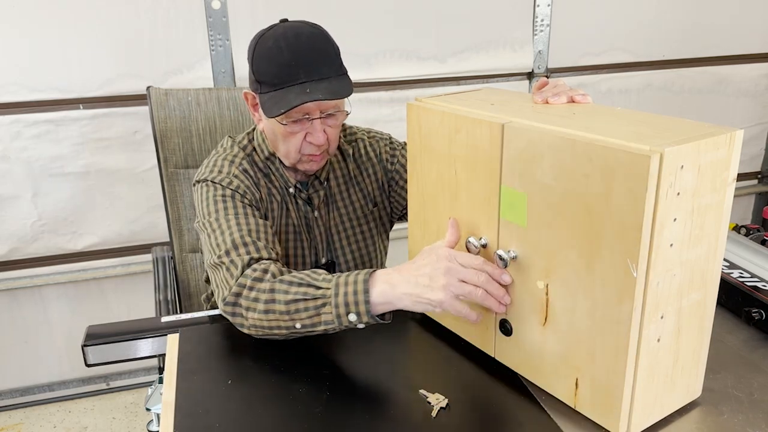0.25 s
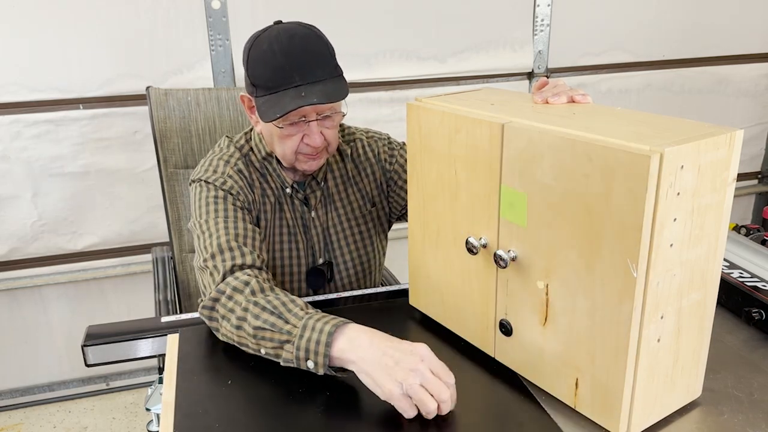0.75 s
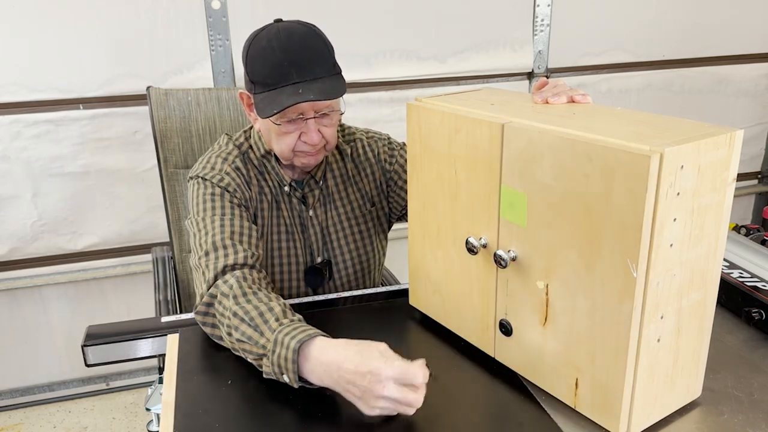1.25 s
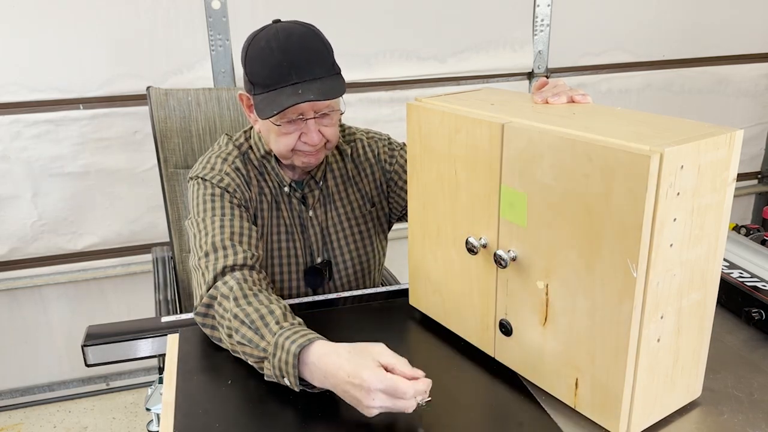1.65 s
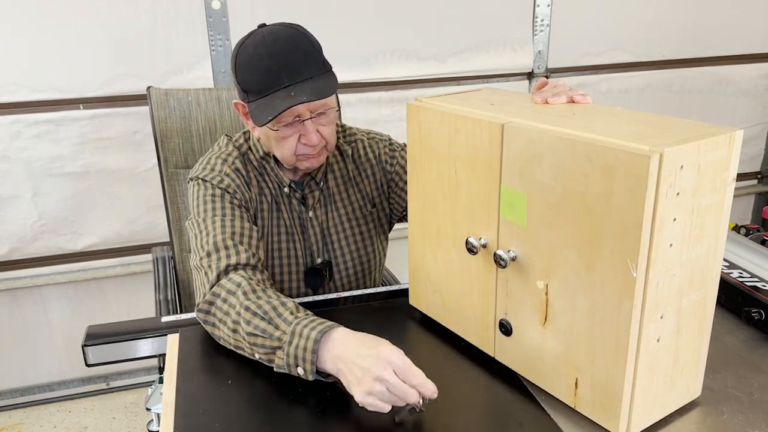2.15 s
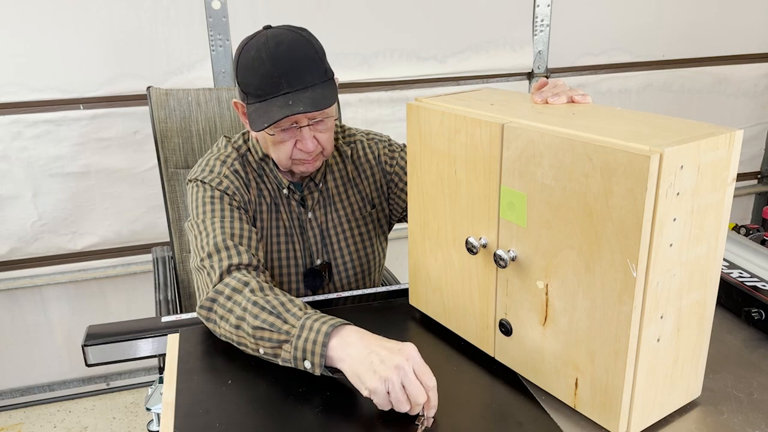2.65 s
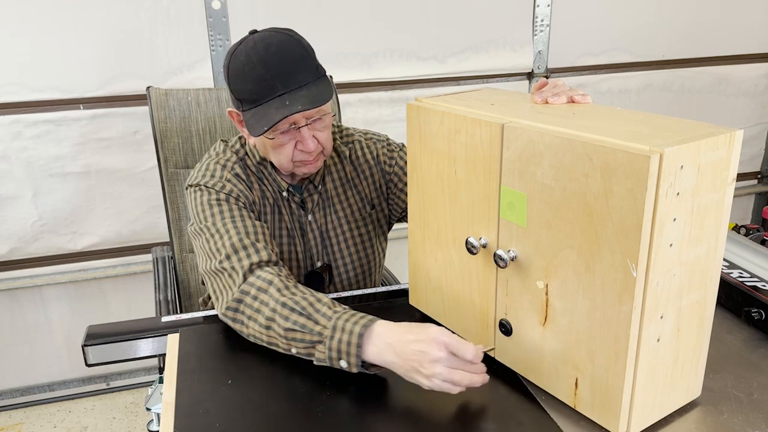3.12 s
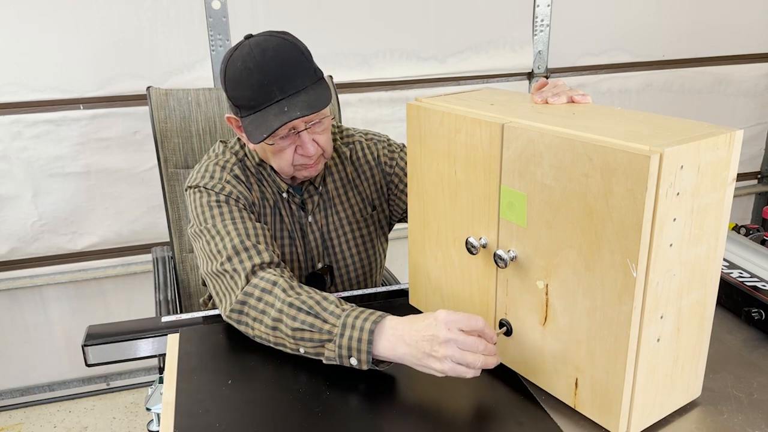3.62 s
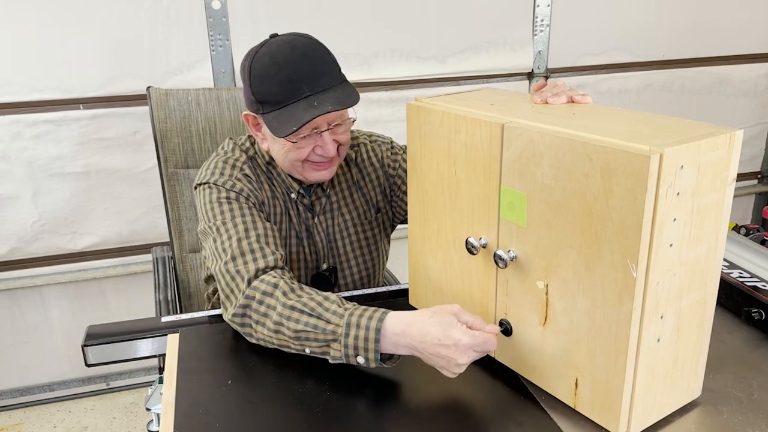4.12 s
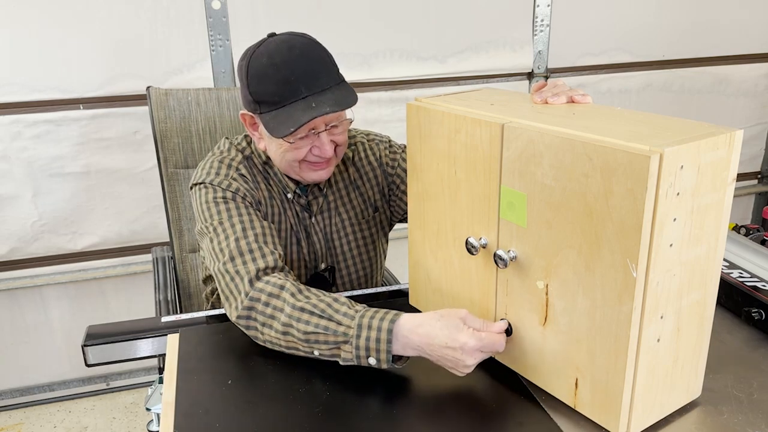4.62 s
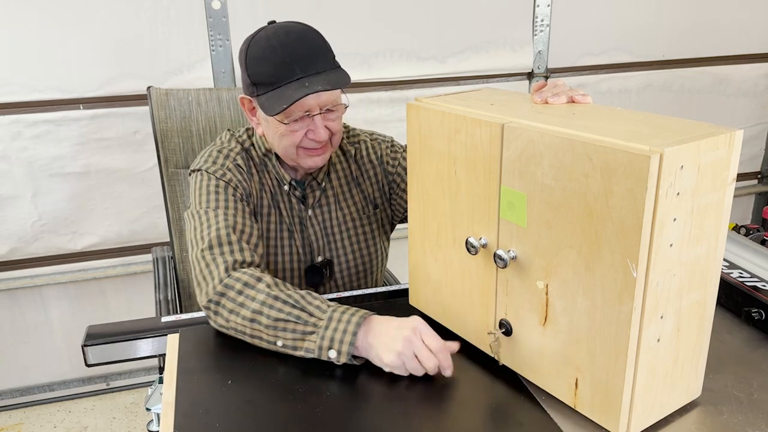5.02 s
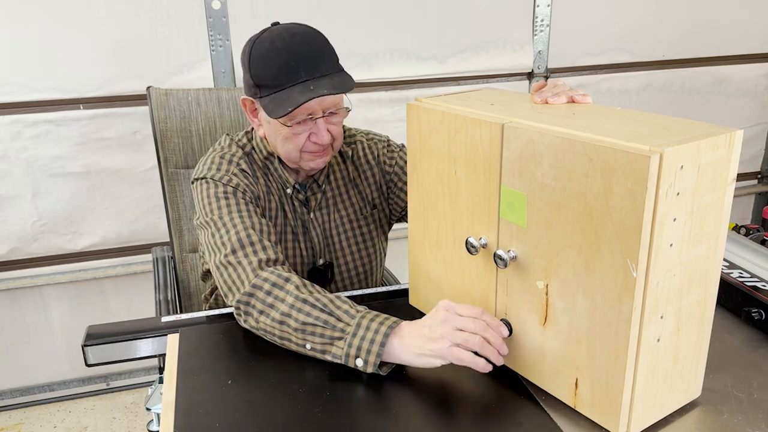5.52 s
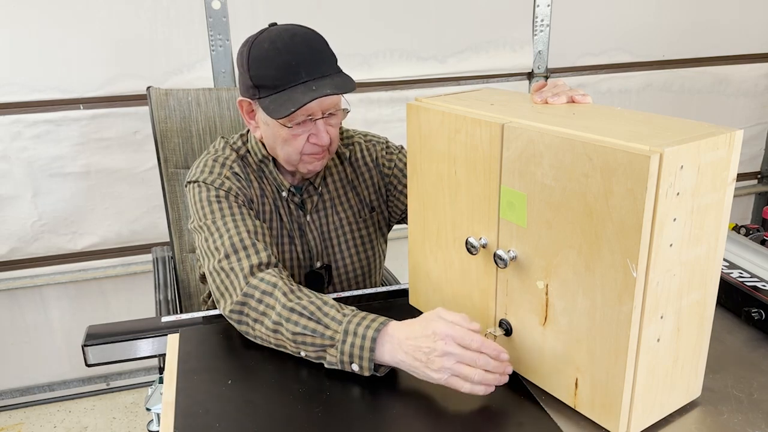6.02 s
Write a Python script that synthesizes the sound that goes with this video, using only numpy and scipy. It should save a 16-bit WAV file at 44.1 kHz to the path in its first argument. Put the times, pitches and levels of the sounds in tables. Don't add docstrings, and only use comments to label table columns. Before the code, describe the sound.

A plywood cabinet door slams shut at once, distorting slightly. Fingers scrape a small key off a table top; it clinks, drops with sharp clacks and is dragged up again. It then ticks into a cam lock, with woody knocks through the door, and a firm clack follows as the locked door is tugged. Faint sleeve rustle and hand shuffling run beneath. Close microphone in a quiet garage with short reverberation.

```python
import sys
import numpy as np
from scipy import signal
from scipy.fft import rfft, irfft, next_fast_len
from scipy.io import wavfile
from scipy.ndimage import uniform_filter1d

SR = 44100
rng = np.random.default_rng(int(sys.argv[2]) if len(sys.argv) > 2 else 0)


def voltage_ratio(decibels):
    exponent = np.asarray(decibels, float) / 20
    return 10 ** exponent


def file_out(sig):
    cols = np.atleast_2d(sig).T
    lim = np.clip(cols, -1, 1)
    pcm = np.round(lim * 32767).astype(np.int16)
    wavfile.write(sys.argv[1], SR, pcm)


N = 276507

# (time [s], peak [dB], thud [dB], bright [dB], contact [ms])
SLAM_HITS = [
    (0, 4.5, 4, 7, 3.5),
    (.01, -1.5, 6, -2, 3.3),
    (.027, -5, 11.5, 9, 4.6),
    (.036, -11, 12, -8, 2.2),
    (.046, -14, 12, -11, 6.1),
    (.065, -23, 10, 0, 12),
    (.17, -55.5, 27.5, -16, 5.8),
    (.214, -51, -2, -8, 1.4),
    (.35, -49.5, 12, -7.5, 3.8),
]
# (frequency [Hz], width [Hz], level [dB])
CARCASS_MODES = [(190, 25, -12), (248, 28, -1), (297, 18, 2), (396.4, 52, -3.5), (544.4, 40, -4),
                 (593, 65, 2), (872, 140, 2.5), (1080, 290, 7.5), (1460, 250, 7.5), (1821, 220, 3.5),
                 (2440, 820, 6.5), (3080, 600, 9.5), (4740, 880, 2.5), (6800, 2200, -4)]
# (frequency [Hz], level [dB per Hz])
AIR_COLOUR = [(12, -13.5), (20, -20), (55, 2), (808, -11), (904, -11), (1270, -18), (3880, -17),
              (6080, -13.5), (7190, -20), (8500, -19), (16200, -32.5)]
# (frequency [Hz], decay by 60 dB [s])
GARAGE_DECAY = [(100, 0.4), (400, 0.2), (2000, 0.2), (6000, 0.15), (14000, 0.069)]
# (hands [dB], sleeve [dB])
AT_REST = (-67.5, -71)
# (start [s], hold [s], level [dB], fade by 20 dB [s])
SLEEVE_MOVES = [(.1, 0.049, -51, 0.1), (.4, 0.038, -53.5, 0.46), (1.05, 0.1, -53.5, 0.34),
                (2.39, 0.023, -44.5, -0.09), (2.93, 0.27, -51, 0.11), (2.75, 0.7, -61, -0.1),
                (4.16, 0.075, -55, 0.1), (4.52, 0.017, -51.5, 0.43), (4.8, .05, -51, .5),
                (4.92, 0.13, -46.5, 0.14), (5.33, 0.048, -48, 0.27), (5.5, 0.16, -53.5, -0.06),
                (5.84, 0.37, -61, 0.3)]
# (frequency [Hz], level [dB per Hz])
CLOTH_COLOUR = [(410, -38), (700, -3), (852, -7), (1260, -12), (1380, -12.5), (3030, -10.5), (4210, -10.5),
                (6920, -12.5), (14000, -25), (16000, -31)]
# (start [s], hold [s], level [dB], fade by 20 dB [s])
HAND_MOVES = [
    (.27, 0.024, -51, 1),
    (.79, 0.019, -35.5, 0.1544),
    (1.05, 0.42, -59.5, -1.5),
    (2.37, 0.31, -44, 0.17),
    (3.8, 0.98, -54.5, 1.5),
    (4.87, 0.0092, -44, .5),
    (5.53, 0.034, -50.5, -0.5),
    (5.88, 0.39, -56.5, -0.3),
]
# (frequency [Hz], level [dB per Hz])
SHUFFLE_COLOUR = [(35, -41.5), (60, -20.5), (155, -9.5), (363, -4.5), (593, -12.5), (665, -14),
                  (759, -16.5), (3000, -26), (3900, -57), (6600, -120)]
# (time [s], peak [dB], thud [dB], bright [dB])
PICK_UP_HITS = [(0.604, -42, 13.5, 0.5), (0.662, -49, 24, -18), (0.733, -23.5, -22, 1.5),
                (0.745, -23, -7, -7), (0.762, -13.5, -12, -1), (0.78, -23, -19, -16), (0.803, -27, -22, 2),
                (0.837, -26.5, 0, -19.5), (0.897, -33, 9, -4), (0.938, -17.5, -9.5, 4),
                (1.1288, -20.5, -12, -8), (1.289, -51.5, 29.5, -19), (1.319, -49, 10, -14.5)]
# (time [s], peak [dB], thud [dB], bright [dB])
DROP_HITS = [(1.492, -23, -6, -14.5), (1.555, -15, -21.5, -14), (1.606, -22.5, -12.5, -17),
             (2.1946, -3, -18, -3.5), (2.24, -1.5, -3.5, -10), (2.2528, 0.5, -8, -17),
             (2.2603, -1, -13, -1.5), (2.2662, -9, -6.5, -15), (2.2898, -7, -20, -10),
             (2.3703, -12.5, -33.5, -7.5), (2.391, -13.5, -38, -3.5), (2.4093, -14.5, -20, 4),
             (2.4205, -19, -2, -2), (2.432, -24, -5, -15), (2.708, -38, -13, -20), (2.7282, -29, -25, -10),
             (2.7559, -22, -7, -2), (2.801, -29, -5, -14), (2.835, -25, -21, -4), (2.85, -21.5, -20, -3)]
# (middle [s], length [s], level [dB], thud [dB], bright [dB])
TABLE_SLIDES = [(0.754, 0.05, -31, -8, 4), (0.79, 0.062, -35.5, -2.5, 0.5), (0.836, .09, -41.5, 1, -4),
                (0.905, 0.05, -51, 14.5, -1), (0.94, 0.019, -21, -28, 3.5), (0.97, .07, -45, -34, 1),
                (1.071, .05, -41, -24, 1), (1.099, .07, -45.5, -13, -11), (2.324, .12, -29.5, -7.5, -15),
                (2.43, .06, -32, -20, 1), (2.505, .14, -42, -21, -16), (2.589, .1, -30, -29, -10),
                (2.682, .15, -45, -7, -22), (2.822, .08, -40, -7, -7)]
# (time [s], peak [dB])
GRAIN_SKIPS = [(.7506, -18.5), (.7958, -28), (.8196, -25.5), (.8272, -31), (1.0573, -39), (1.0714, -31),
               (1.0838, -33), (1.0998, -33), (1.1062, -34), (1.1118, -33), (1.1137, -35), (1.1185, -28),
               (2.2787, -19), (2.3006, -20), (2.3105, -24), (2.3228, -24), (2.3453, -21), (2.3573, -25),
               (2.3621, -24), (2.4063, -22.5), (2.4261, -21.5), (2.445, -31), (2.5173, -34), (2.5318, -32),
               (2.5357, -30), (2.5632, -26), (2.5779, -20.5), (2.5942, -20.5), (2.6087, -22.5),
               (2.6234, -29), (2.6507, -36), (2.6644, -35), (2.6779, -36), (2.6901, -35), (2.7592, -27),
               (2.7615, -31), (2.7699, -34), (2.8063, -35), (2.8099, -33), (2.8136, -33), (2.8191, -34),
               (2.8232, -32.5), (2.8292, -30.5)]
# (frequency [Hz], width [Hz], level [dB])
TABLE_MODES = [(285.7, 35, 15), (547, 76, 7), (710, 51.5, 8.5), (1082, 58, 5), (1360, 135, 1.5),
               (1850, 112, 3), (2230, 370, -3), (2711, 140, 4.5), (3590, 316, 3), (4713, 260, 7.5),
               (6100, 990, -1.5), (7400, 900, -26)]
# (time [s], level [dB])
TABLE_PUSHES = [(.61, -51), (0.666, -47.5), (0.739, -42), (0.9, -48), (0.941, -50.5), (1.292, -46),
                (1.55, -61.5), (2.196, -43.5), (2.243, -39), (2.411, -48.5), (2.63, -52), (2.719, -48),
                (3.99, -57.5), (4.2, -58.5), (4.345, -44.5), (4.387, -47.5), (4.737, -48), (4.865, -49.5),
                (5.589, -58)]
# (middle [s], length [s], frequency [Hz], width [Hz], level [dB])
PRESSED_WOOD = [(.785, .06, 824, 42, -29), (.75, 0.032, 5400, 150, -39), (.734, 0.0099, 580, 270, -31.5),
                (.762, .04, 1170, 60, -30), (.795, .03, 620, 120, -28.5), (.905, .05, 700, 250, -38),
                (.955, .04, 1150, 100, -35.5), (0.99, .03, 1900, 150, -39), (2.585, .06, 2200, 140, -33),
                (2.6, .05, 3650, 190, -36.5), (2.635, 0.0248, 297, 58, -38), (2.695, .05, 2000, 250, -46),
                (2.71, 0.0251, 647, 100, -39.5), (4.39, .055, 544, 29, -23), (4.393, .06, 285, 31, -22.5),
                (4.417, .018, 420, 215, -25), (4.45, .1, 295, 21, -32), (2.258, .035, 720, 96, -20.5),
                (2.42, .06, 700, 120, -33), (5.603, 0.035, 680, 100, -23), (3.755, .03, 620, 140, -33),
                (4.41, .03, 1170, 100, -30), (4.375, 0.014, 2650, 220, -33), (5.875, 0.055, 499, 330, -44),
                (5.91, 0.0396, 335, 70, -42.5)]
# (middle [s], length [s], frequency [Hz], width [Hz], level [dB])
RUBBED_KEY = [(1.092, 0.055, 10410, 10, -55), (1.2, 0.032, 10410, 33, -66), (2.1, .02, 8300, 150, -58.5),
              (.757, .05, 6050, 250, -33.5), (.757, .045, 11100, 300, -41), (.75, .04, 10400, 230, -43),
              (.768, .03, 4200, 140, -36), (.94, .016, 6600, 500, -30), (.942, .025, 10800, 600, -38),
              (2.225, 0.097, 10410, 40, -50), (2.22, 0.068, 11160, 40, -52), (2.33, .08, 10030, 40, -59),
              (2.376, .025, 15500, 120, -59), (2.38, .03, 9000, 100, -56), (2.425, 0.054, 10450, 330, -46),
              (2.44, .1, 11200, 40, -62), (2.485, .05, 10400, 20, -66), (2.59, .05, 11050, 250, -57),
              (2.9, .07, 7100, 200, -63), (2.78, 0.058, 10410, 15, -48), (2.768, 0.027, 10950, 200, -49),
              (2.772, .04, 8650, 300, -53), (2.766, .03, 13500, 1500, -52), (2.825, .06, 10950, 120, -54),
              (2.855, 0.0603, 10410, 20, -55), (2.875, .06, 15500, 120, -59), (1.19, .09, 15510, 30, -60),
              (2.895, .04, 10450, 60, -57), (5.512, .04, 6050, 400, -50), (5.512, .02, 7800, 200, -49),
              (5.512, .035, 10750, 400, -52), (5.578, .02, 10700, 500, -50),
              (5.618, .035, 9900, 250, -42.5), (5.615, .04, 15600, 80, -60)]
# (time [s], decay by 60 dB [s], frequency [Hz], width [Hz], level [dB])
METAL_TICKS = [(.762, 0, 890, 496, -21), (.7815, 0.04, 910, 500, -21), (.897, -0.06, 455, 200, -31),
               (1.072, 0.08, 1510, 500, -38), (1.1582, .012, 11000, 3000, -38),
               (3.551, -0.03, 6500, 899, -41.5), (3.614, 0.03, 6440, 1200, -47),
               (3.726, 0, 3500, 1500, -48), (4.078, 0, 1800, 500, -47), (2.2893, -0.02, 700, 300, -17),
               (.7815, -0.03, 4800, 500, -28), (.802, .025, 4750, 150, -29.5), (.89, -0.04, 6200, 600, -44),
               (.9165, .012, 6100, 500, -43), (.9165, -0.07, 4200, 400, -40), (.928, -0.14, 4000, 400, -42),
               (2.421, -0.02, 4600, 900, -25), (2.846, 0.011, 11500, 2800, -37),
               (2.9037, .008, 12000, 2500, -46.5), (2.9137, 0.012, 11500, 2800, -33),
               (5.837, .035, 2800, 500, -33), (5.852, 0.016, 5900, 900, -37),
               (5.867, 0.03, 6500, 1800, -42), (6.108, 0, 1490, 501, -41), (6.236, -0.05, 600, 300, -44)]
# (time [s], peak [dB], upper tone [dB])
KEY_CLINKS = [
    (1.129, -57.5, -16),
    (1.9978, -62.5, -5.5),
    (2.1952, -41, 7),
    (2.2613, -46, -4),
    (2.4089, -46, -5),
    (2.7564, -52, -8),
    (2.8465, -49, 9),
    (4.3856, -52, 7),
    (4.6838, -57, 3),
    (4.7875, -57, -1),
]
# (time [s], peak [dB], upper tone [dB])
SPARE_CLINK_HITS = [
    (2.2951, -45.5, -8),
    (2.373, -51, 4),
    (2.9047, -64, 19),
]
# (time [s], peak [dB], upper tone [dB], ring time [s])
DANGLING_CLINK = [
    (1.1525, -33.5, -3, 0.06),
]
# (time [s], level [dB], ring time [s])
LOOSE_SWINGS = [
    (1.153, -43.5, 0.07),
    (2.375, -62, .015),
    (2.914, -45, 0.004),
]
# (frequency [Hz], level [dB], decay by 60 dB [s])
KEY_TONES = [(10390, -1, 0.2), (10200, -28.5, 0.2), (15510, -18, .1)]
# (frequency [Hz], level [dB], decay by 60 dB [s])
KEY_UPPER = [(11160, 0, .2)]
# (frequency [Hz], level [dB], decay by 60 dB [s])
KEY_BENDING = [(3833, -1, .22), (8231, 0, .6)]
# (frequency [Hz], level [dB], decay by 60 dB [s])
SPARE_TONES = [(10030, 0, .2)]
# (frequency [Hz], level [dB], decay by 60 dB [s])
SPARE_UPPER = [(10860, 0, .2)]
# (time [s], peak [dB], thud [dB], bright [dB])
DOOR_HITS = [(3.551, -24, -15, -14), (3.603, -32.5, -17, -20), (3.614, -33, -0.5, -16),
             (3.743, -19.5, -26.5, -22), (3.754, -33.5, 9, -32), (3.94, -42, 6.5, -16.5),
             (3.97, -27.5, -25, -14), (4.009, -21.5, -12, -30), (4.2035, -20, -4.5, -18),
             (4.218, -16.5, -8.5, -35), (4.338, -19.5, -1.5, -31), (4.368, -20.5, 4, -18),
             (4.382, -16, 1, -4.5), (4.394, -19, 0, -9), (4.407, -12, -3, -2), (4.524, -30, -16, -11.5),
             (4.686, -25, -2, -23), (4.692, -32, -21, -5), (4.722, -38, 3.5, -8), (4.743, -37.5, 7.5, -7),
             (4.843, -44, 12, -18.5), (4.866, -29.5, 7, -5), (4.903, -37, 1, -18), (5.247, -38, -29, -18)]
# (middle [s], length [s], level [dB], thud [dB], bright [dB])
BARREL_TURNS = [
    (3.999, 0.18, -48.5, 8, -32),
    (4.213, 0.075, -45.5, 9.5, -13),
    (4.394, 0.081, -31, 4.5, -8),
    (4.547, .1, -47.5, 5, -13),
    (4.906, .14, -49.5, -7, -17),
    (5.515, 0.045, -39.5, 0.5, -14),
    (5.895, 0.091, -59.5, 0, -0.5),
]
# (time [s], peak [dB])
SLOT_PROBES = [
    (4.6655, -41),
    (4.6833, -38),
    (4.7105, -39),
    (4.8763, -39),
    (5.5821, -37),
]
# (frequency [Hz], width [Hz], level [dB])
DOOR_MODES = [(240.8, 10.4, 5.5), (297, 26.5, 8), (353.3, 21, 10.5), (542, 53, 11), (597.5, 32, 12),
              (712, 47, 6), (973, 69, 1.5), (1334, 132, 5), (1950, 270, -8.5), (2260, 340, -0.5),
              (2687, 173, -0.5), (3320, 270, 0.5), (4480, 630, -9), (6440, 580, 0.5)]
# (time [s], peak [dB], thud [dB], bright [dB])
LOCKED_HITS = [(5.4455, -23.5, -17, -18), (5.479, -38, 11, -17), (5.502, -40, -4, -8),
               (5.517, -34, -2, -12), (5.586, -12.5, -6, 5), (5.5872, -5, 1.5, -15), (5.602, -23, 3.5, -11),
               (5.619, -38.5, -17.5, -8), (5.836, -32, -0.5, -5), (5.867, -25.5, -4, -6),
               (5.852, -41, 15, -4), (5.906, -34, -7.5, -17), (6.108, -39.5, -12, -14),
               (6.235, -46.5, 4.5, -21)]
# (frequency [Hz], width [Hz], level [dB])
LOCKED_MODES = [(354.2, 15, 4.5), (440, 53, 7), (587, 98, 7), (724, 83, 11), (1033, 114, 2),
                (1400, 180, 3.5), (1800, 48, -5), (2340, 290, 0.5), (2800, 260, -1.5), (3310, 230, 2),
                (4350, 700, 0), (6030, 3300, 2)]


def along(points, hz):
    f, v = np.transpose(points)
    return np.interp(np.log(hz + 1), np.log(f + 1), v)


def filtered(x, response):
    m = next_fast_len(N + SR // 2)
    return irfft(rfft(x, m) * response(np.fft.rfftfreq(m, 1 / SR)), m)[..., :N]


def unit(x):
    return x / np.sqrt(np.mean(x ** 2) + 1e-20)


def timed(hits, ms):
    return [(*hit, ms * voltage_ratio(0.18 * (hit[1] + 22.0))) for hit in hits]


def forces(hits, strokes, grit_db, snap):
    force = np.zeros((3, N + SR))
    t = np.arange(SR // 10) / SR
    for s, db, thud_db, bright_db, ms in hits:
        u = t * 1000 / max(ms, .2)
        burst = (u + 0.12) * np.exp(-1.5 * u) * rng.standard_normal((3, len(t)))
        burst[0] = 0.55 * burst[0] + 3 * np.exp(-t / 0.00022)
        burst[1:, 0] += [snap, snap / 3]
        burst /= np.linalg.norm(burst, axis=1, keepdims=True)
        start = round(s * SR)
        force[:, start:start + len(t)] += voltage_ratio([[db + thud_db - 12.5], [db], [db + bright_db]]) * burst
    for s, length, db, thud_db, bright_db in strokes:
        u = np.arange(SR // 4) / SR / length
        grain = voltage_ratio(grit_db * rng.standard_normal(len(u) // 40 + 1)).repeat(40)[:len(u)]
        grit = rng.standard_normal((3, len(u))) * grain
        swell = np.sin(np.pi * np.minimum(u, 1)) ** 2
        start = round((s - length / 2) * SR)
        level = voltage_ratio([[db + thud_db], [db], [db + bright_db]])
        force[:, start:start + len(u)] += level * 0.177 * swell * grit
    return force[:, :N]


def body(force, modes, direct_db, low_hz, top_hz):
    def below(f, hz):
        return 1 / (1 + 1.4j * f / hz - (f / hz) ** 2)

    def above(f, hz):
        return below(f, hz) * (f / hz) ** 2

    def response(f):
        panel = voltage_ratio(direct_db)
        for k, (centre, width, db) in enumerate(modes):
            mode = 1j * f * width / (centre * centre - f * f + 1j * f * width)
            panel = panel + (-1) ** k * voltage_ratio(db) * mode
        thud = above(f, low_hz) * below(f, 570) ** 2
        knock = above(f, 480) * below(f, 3000) ** 2
        bright = above(f, 2200) * below(f, top_hz) ** 2
        bands = panel * np.array([thud, knock, bright])
        return bands / np.abs(irfft(bands)).max(axis=1, keepdims=True)

    return filtered(force, response).sum(0)


def door_slam():
    force = forces(SLAM_HITS, [], grit_db=0, snap=.5)
    return body(force, CARCASS_MODES, direct_db=-15.0, low_hz=190, top_hz=10700)


def garage(x):
    out = np.zeros(N + 2 * SR)
    step = SR // 5
    for start in range(0, N, step):
        hz, t, z = signal.stft(rng.standard_normal(SR // 2), SR, nperseg=256)
        decay = voltage_ratio(-60 * t / along(GARAGE_DECAY, hz)[:, None])
        tail = signal.istft(z * decay, SR, nperseg=256)[1]
        wet = signal.fftconvolve(x[start:start + step], tail / np.linalg.norm(tail))
        out[start + 200:][:len(wet)] += wet
    return out[:N]


def rush(spectrum, patchy_db):
    z = signal.stft(rng.standard_normal(N), nperseg=256)[2]
    field = uniform_filter1d(uniform_filter1d(rng.standard_normal(z.shape), 6, 0), 8, 1)
    x = signal.istft(z * voltage_ratio(patchy_db * unit(field)), nperseg=256)[1][:N]
    return unit(filtered(x, lambda hz: voltage_ratio(along(spectrum, hz))))


def still_air():
    return voltage_ratio(-56.5 - 6.5) * rush(AIR_COLOUR, patchy_db=.4)


def gestures(moves, rest_db):
    t = np.arange(0, N, 64) / SR
    power = voltage_ratio(2 * rest_db)
    for s, hold, db, fade in moves:
        away = np.maximum(np.maximum(s - t, t - s - abs(hold)), 0)
        power = power + voltage_ratio(2 * (db - 20 * away / max(fade, .02)))
    return np.interp(np.arange(N) / SR, t, np.sqrt(power))


def sleeve():
    return gestures(SLEEVE_MOVES, AT_REST[1]) * rush(CLOTH_COLOUR, patchy_db=1.2)


def hands():
    return gestures(HAND_MOVES, AT_REST[0]) * rush(SHUFFLE_COLOUR, patchy_db=2.5)


def taps(rows, thud_db, bright_db, ms):
    s, db = np.transpose(rows)
    force = np.zeros(N)
    force[np.round(s * SR).astype(int)] = -voltage_ratio(db)
    push = np.exp(-np.arange(SR // 100) / SR * 1000 / max(ms, .01))
    pushes = np.convolve(force, push / np.linalg.norm(push))[:N]
    return voltage_ratio([[thud_db], [0], [bright_db]]) * pushes


def key_on_table():
    hits = timed(PICK_UP_HITS, ms=1.5) + timed(DROP_HITS, ms=0.64)
    force = forces(hits, TABLE_SLIDES, grit_db=3, snap=3.84)
    force = force + taps(GRAIN_SKIPS, thud_db=-17, bright_db=-9, ms=0.04)
    return body(force, TABLE_MODES, direct_db=-12, low_hz=165.0, top_hz=9000)


def table_boom(hz, t60, rise):
    out = np.zeros(N + SR)
    t = np.arange(SR // 2) / SR
    for s, db in TABLE_PUSHES:
        envelope = voltage_ratio(db + 8.5 - 60 * t / t60) * (1 - np.exp(-t / rise))
        out[round(s * SR):][:len(t)] += envelope * np.sin(2 * np.pi * hz * t)
    return out[:N]


def narrow(rows, struck):
    out = np.zeros(N + SR)
    t = np.arange(SR // 8) / SR
    for s, length, hz, width, db in rows:
        keep = np.exp(-2 * np.pi * max(width, 10) / SR)
        drive = rng.standard_normal((2, 2 * len(t)))
        slow = signal.lfilter([1], np.poly([keep] * 3), drive[0] + 1j * drive[1])[len(t):]
        u = t / max(length, .004)
        if struck:
            shape = voltage_ratio(-60 * u) * (1 - np.exp(-t / 0.00033))
            start = round(s * SR)
        else:
            shape = np.sin(np.pi * np.minimum(u, 1)) ** 2
            start = round((s - length / 2) * SR)
        sound = shape * (slow * np.exp(2j * np.pi * hz * t)).real
        out[start:start + len(t)] += voltage_ratio(db) * sound * np.linalg.norm(shape) / np.linalg.norm(sound)
    return out[:N]


def handling():
    rubbed = narrow(RUBBED_KEY, struck=False)
    pressed = narrow(PRESSED_WOOD, struck=False)
    ticks = narrow(METAL_TICKS, struck=True)
    return rubbed + pressed + ticks


def tones(modes, held, rings_on=.1):
    t = np.arange(SR // 4) / SR
    ring = 0
    for hz, level, t60 in modes:
        decay = voltage_ratio(level + rng.normal(0, 1.6) - 60 * t / t60)
        ring = ring + decay * np.sin(2 * np.pi * (hz * t + rng.random()))
    return ring * (rings_on + 1 / (1 + (t / max(held, .003)) ** 3.5))


def grip():
    return .021 * voltage_ratio(3 * rng.standard_normal())


def keys_ringing():
    out = np.zeros(N + SR)
    t = np.arange(SR // 4) / SR
    clinks = [(*c, grip(), KEY_TONES, KEY_UPPER) for c in KEY_CLINKS]
    clinks += [(*c, grip(), SPARE_TONES, SPARE_UPPER) for c in SPARE_CLINK_HITS]
    clinks += [(*c, KEY_TONES, KEY_UPPER) for c in DANGLING_CLINK]
    for s, db, upper_db, held, low, high in clinks:
        tick = voltage_ratio(1.5 - 60 * t / 0.0095) * np.diff(rng.standard_normal(len(t) + 1))
        ring = tones(low, held) + voltage_ratio(upper_db - 5) * tones(high, held)
        out[round(s * SR):][:len(t)] += voltage_ratio(db + 1.0) * (ring + tick)
    for s, db, held in LOOSE_SWINGS:
        out[round(s * SR):][:len(t)] += voltage_ratio(db) * tones(KEY_BENDING, held, rings_on=0)
    return out[:N]


def key_in_lock():
    force = forces(timed(DOOR_HITS, ms=3.4), BARREL_TURNS[:-2], grit_db=-1.5, snap=1.0)
    force = force + taps(SLOT_PROBES, thud_db=-27, bright_db=-4, ms=.03)
    return body(force, DOOR_MODES, direct_db=-9.0, low_hz=146, top_hz=6500)


def key_on_locked_door():
    force = forces(timed(LOCKED_HITS, ms=2.8), BARREL_TURNS[-2:], grit_db=5, snap=2.9)
    return body(force, LOCKED_MODES, direct_db=-8.0, low_hz=300, top_hz=8805)


def scene():
    slam = door_slam()
    near = voltage_ratio(-3.0) * key_on_table() + voltage_ratio(-0.5) * key_in_lock() + voltage_ratio(-2.0) * key_on_locked_door()
    fine = keys_ringing() + handling()
    room = garage(voltage_ratio(-7.0) * slam + voltage_ratio(-12.5) * near + voltage_ratio(-17) * fine)
    hum = table_boom(hz=104.5, t60=.45, rise=.012)
    return (slam + near + fine + room + hum + hands() + sleeve() + still_air())[None]


def roll_off(x):
    return signal.sosfilt(signal.butter(12, 16440, fs=SR, output="sos"), x)


def record(dry):
    clipped = dry / (1 + np.abs(dry / .98) ** 8) ** (1 / 8)
    limited = filtered(clipped, lambda hz: np.where(hz < 15800, 1, voltage_ratio(-16)))
    return roll_off(limited)


dry = scene()
out = record(dry)
file_out(out)
```